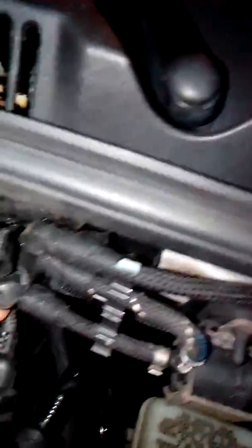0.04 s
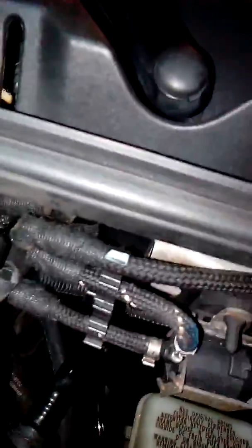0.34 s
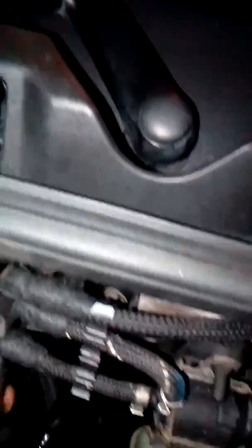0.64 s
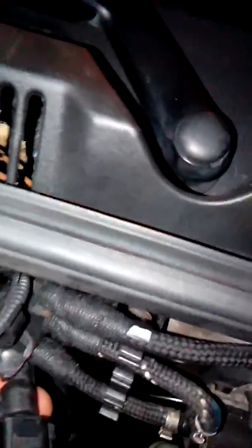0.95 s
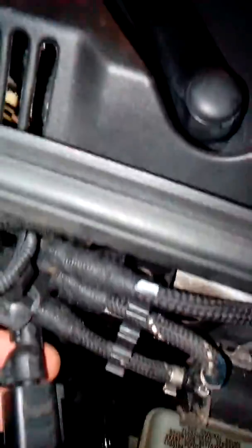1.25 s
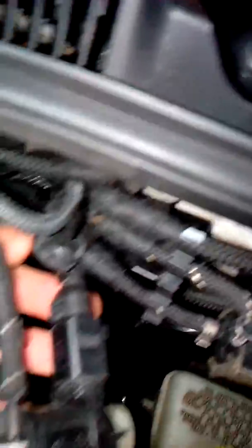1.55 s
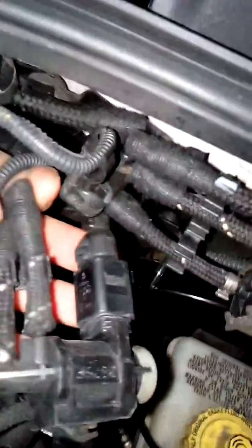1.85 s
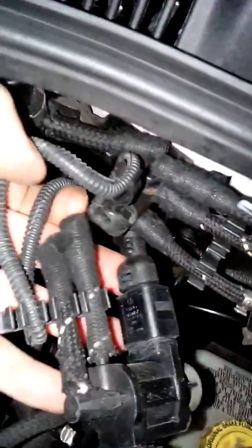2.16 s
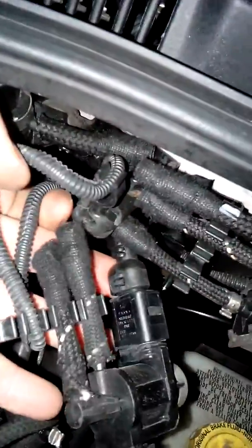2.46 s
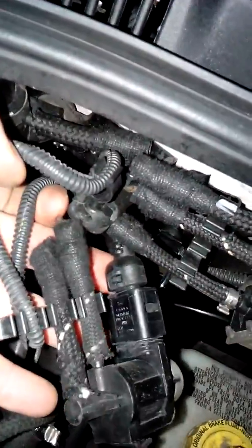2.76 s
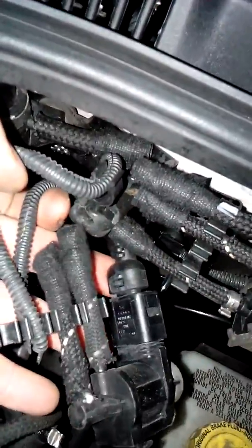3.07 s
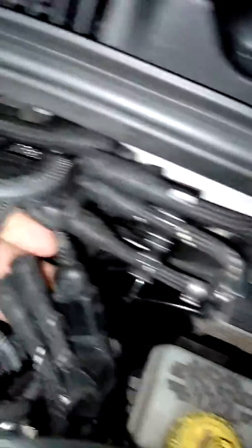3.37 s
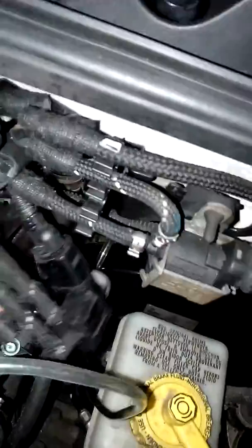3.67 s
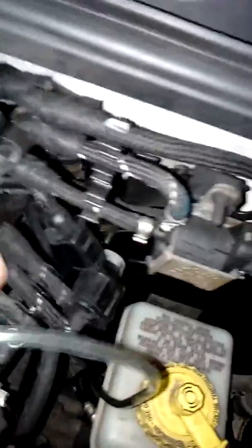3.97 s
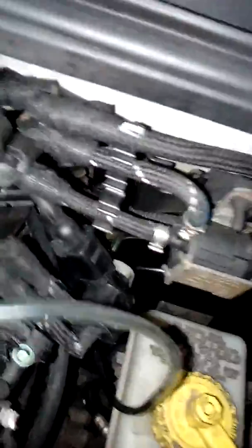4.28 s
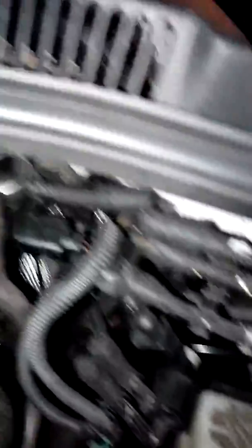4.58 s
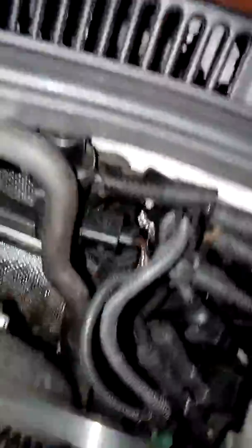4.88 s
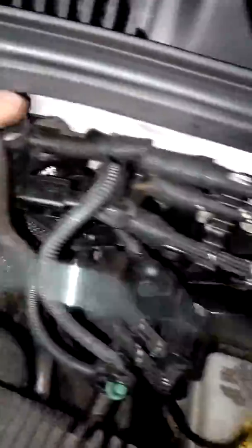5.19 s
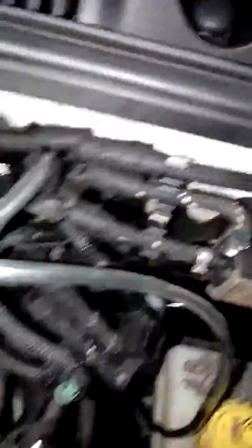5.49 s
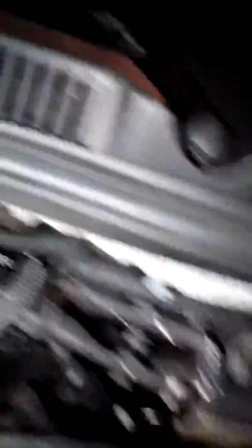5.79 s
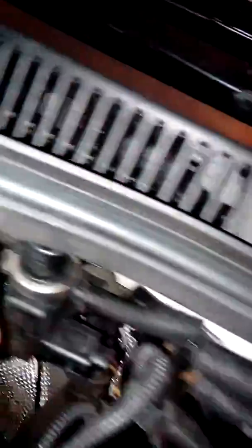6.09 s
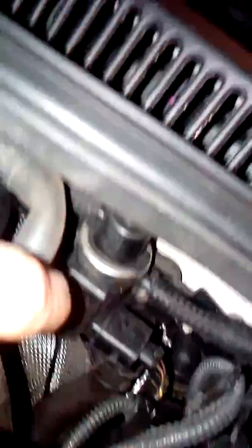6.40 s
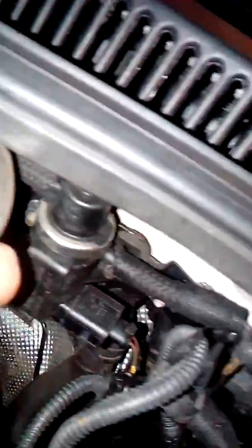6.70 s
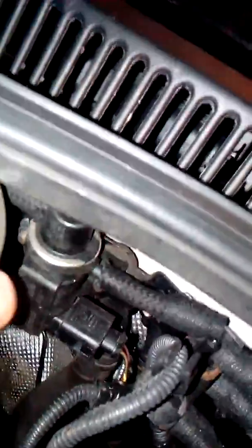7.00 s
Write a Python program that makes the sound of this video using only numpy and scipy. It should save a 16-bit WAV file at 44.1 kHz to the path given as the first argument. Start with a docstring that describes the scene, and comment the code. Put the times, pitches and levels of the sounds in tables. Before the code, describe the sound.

A hand moves rubber hoses, ribbed wire tubing and a plastic connector in a parked car's engine bay. A sharp latch click is followed by light ticks, soft rasps and dull bumps on the microphone's case. After a lull comes a louder flurry of clicks and sliding, then more muffled bumps and a brief rub. The clicks are close and to the right, over faint rumble and hiss.

```python
"""Small plastic clicks, ticks and soft rasps, close by on the right, over dull bumps and rubbing.
A hand moves hoses, ribbed wire tubing and a connector in a parked car's engine bay: the latch clicks,
the parts knock together and braided sleeves slide over skin. The other hand bumps and rubs the
camera's case. Under it all lie a faint low rumble and hiss."""
import sys
import numpy as np
from scipy import signal
from scipy.fft import rfft, irfft, next_fast_len
from scipy.io import wavfile
from scipy.ndimage import map_coordinates

SR = 44100
rng = np.random.default_rng(int(sys.argv[2]) if len(sys.argv) > 2 else 0)


def pcm_store(signal):
    """Save signal as 16-bit PCM."""
    levels = np.round(np.clip(np.atleast_2d(signal), -1, 1) * 32767)
    wavfile.write(sys.argv[1], SR, levels.astype(np.int16).T)


N = 314871

# hollow tones of the hoses: (pitch [Hz], width [Hz], level [dB])
HOSE_TONES = [(350, 156, 4), (1004, 95, -3.5), (1248, 54, 1.5), (1820, 330, -0.5), (2800, 1900, -7)]
# slides of a sleeve over skin: (fastest moment [s], length [s], rasp [dB], fizz [dB])
SLIDES = [(0.365, 0.062, -53.5, -51), (0.522, 0.048, -50.5, -48), (0.626, 0.2, -57.5, -53),
          (0.878, 0.099, -49, -47), (0.915, 0.087, -48.5, -48), (0.987, 0.018, -49.5, -61),
          (2.264, 0.18, -54.5, -47), (3.52, 0.13, -53, -50), (3.59, 0.076, -54.5, -60),
          (3.74, 0.11, -46.5, -47), (3.901, 0.15, -47, -43), (4.023, 0.046, -48, -50),
          (4.076, 0.069, -40, -41), (4.186, 0.28, -49, -43), (4.464, 0.11, -57, -44),
          (4.56, 0.19, -56.5, -51.5), (5.314, 0.028, -66, -37.5), (5.39, 0.24, -52, -50),
          (5.693, 0.14, -62, -72), (6.03, 0.56, -64, -73), (6.79, 0.21, -60.5, -53.5)]
SLIDE_SWELL = dict(rise=0.6, shape=1.7)
GRIP_SWELL = dict(rise=0.49, shape=1.5)
TICK_SPAN = SR // 100  # a tick's or click's level is its energy spread over these 10 ms


def amp(db):
    """Turn decibels into a gain to multiply by."""
    return 10 ** (np.asarray(db) / 20)


def unit(x):
    """Scale a sound to an average strength (rms) of 1."""
    return x / np.sqrt(np.mean(x ** 2) + 1e-30)


def along(points, hz):
    """Read between (frequency [Hz], value) points, with octaves evenly spaced."""
    f, v = np.transpose(points)
    return np.interp(np.log(hz + 1), np.log(f), v)


def wobble(rate):
    """A smooth random curve through `rate` points a second."""
    return map_coordinates(rng.standard_normal(int(N * rate / SR) + 4), [np.arange(N) * rate / SR])


def filtered(x, response):
    """Scale and delay each frequency f of a sound by response(f)."""
    n = x.shape[-1]
    padded = next_fast_len(n + 4096)
    return irfft(rfft(x, padded) * response(np.fft.rfftfreq(padded, 1 / SR)), padded)[..., :n]


def coloured(x, spectrum):
    """Shape a sound by (frequency [Hz], level [dB]) points, then scale it to strength 1."""
    return unit(filtered(x, lambda f: amp(along(spectrum, f))))


def resonance(f, hz, width):
    """The response of one ringing tone; the narrower it is, the longer it rings."""
    return 1j * f * width / (hz * hz - f * f + 1j * f * width)


def add(track, start, sound):
    """Mix a sound into a track from a start sample on."""
    part = track[start:start + len(sound)]
    part += sound[:len(part)]


def swell(s, length, rise, shape):
    """A hill peaking at time s; rise is the share before the peak, shape 1 is pointed and 4 flat."""
    t = np.arange(-SR, SR) / SR
    distance = np.abs(t / (length * np.where(t < 0, rise, 1 - rise)))
    out = np.zeros(N + 2 * SR)
    add(out, round(s * SR), np.exp(-np.minimum(distance ** shape, 20)))
    return out[SR:SR + N]


def movements(rows, rest_db, rise, shape):
    """A moving hand's gain: swells of (time [s], length [s], level [dB]) over a resting level."""
    power = sum((amp(db) * swell(s, length, rise, shape)) ** 2 for s, length, db in rows)
    return np.sqrt(amp(rest_db) ** 2 + power)


def background(rumble_db=-58, hiss_db=-60, whine_db=-77):
    """A far rumble mostly shared by both microphones, hiss mostly their own, a thin electronic whine."""
    # tone colours of the rumble and the hiss: (frequency [Hz], level [dB])
    rumble_colour = [(20, -13), (32, -7), (60, 1), (105, 0.5), (170, -8.5), (250, -14.5), (450, -17.5),
                     (700, -25), (1200, -25.5), (2500, -49)]
    hiss_colour = [(500, 1.5), (1200, -4.5), (2000, -2.5), (3000, -1), (4300, 0), (7500, -11), (9500, -16),
                   (12500, 0), (15150, -2), (15750, -55)]
    rumble = coloured(rng.standard_normal(N) + 0.59 * rng.standard_normal((2, N)), rumble_colour)
    hiss = coloured(rng.standard_normal((2, N)) + .5 * rng.standard_normal(N), hiss_colour)
    whine = unit(filtered(rng.standard_normal((2, N)), lambda f: resonance(f, 14400, 90) ** 2))
    return amp(rumble_db + 0.62 * wobble(2.5)) * rumble + amp(hiss_db) * hiss + amp(whine_db) * whine


def grip(unrest_db=1.0):
    """Skin creeping on the case gives a dull, lumpy murmur that swells with each shift of the hand."""
    # tone colour of the rubbed case: (frequency [Hz], level [dB])
    case_colour = [(20, -49), (45, -22), (80, 6), (125, 3.5), (190, -8), (300, -15.5), (450, -22.5),
                   (800, -32.5), (2000, -33)]
    # shifts of the grip: (strongest moment [s], length [s], relative level [dB])
    shifts = [(0.03, 0.24, -43.5), (0.38, 0.56, -43), (0.92, 0.34, -42.5), (1.2, 0.42, -42.5),
              (1.66, 0.63, -46), (1.92, 0.21, -48), (3.2, 0.052, -43.5), (3.5, 0.14, -32.5),
              (3.83, 0.98, -48), (4.15, 0.73, -46), (4.58, 0.38, -44.5), (4.94, 0.47, -43),
              (5.385, 0.14, -33), (5.7, 0.45, -38.5), (6.01, 0.3, -41.5), (6.42, 0.26, -45),
              (6.8, 0.9, -45)]
    murmur = unit(amp(unrest_db * wobble(28)) * coloured(rng.standard_normal(N), case_colour))
    return amp(-4.5) * movements(shifts, rest_db=-62.5, **GRIP_SWELL) * murmur


def latch_clicks(spike=.6, tail_db=-17, tail_fade_s=.02):
    """The connector's stiff latch lets go in one sharp, pitchless crack and knocks the hoses."""
    # clicks: (time [s], crack [dB], knock [dB], low cut [Hz], treble change [dB], time to fade 60 dB [s])
    clicks = [(0.055, -19, -57, 2640, 3, 0.0025), (0.1404, -41, -77, 4500, -2, 0.0044),
              (2.8063, -24, -71, 4000, -10, 0.0019), (5.473, -31, -50.5, 2800, -2, 0.008)]
    # tone colour of the latch: (frequency [Hz], level [dB])
    latch_colour = [(1000, -5.5), (2700, 1.5), (3400, -5), (5000, 2), (5800, 0), (7300, -4), (9000, 0.5),
                    (11500, 4), (14500, -2), (15500, -31), (16500, -27)]
    out, t = np.zeros(N), np.arange(SR // 20) / SR
    for s, db, knock_db, low_cut_hz, treble_db, fade_s in clicks:
        fade = amp(-60 * t / fade_s) + amp(tail_db - 60 * t / tail_fade_s)
        burst = rng.standard_normal(len(t)) * fade
        burst += spike * np.linalg.norm(burst) * signal.unit_impulse(len(t), SR // 5000)
        tilt = [(5000, 0), (13000, treble_db)]
        crack = filtered(burst, lambda f: amp(along(latch_colour, f) + along(tilt, f)))
        crack = signal.sosfilt(signal.butter(4, low_cut_hz, "high", fs=SR, output="sos"), crack)
        knock = filtered(burst, hose_response)
        click = amp(db) * unit(crack) + amp(knock_db) * unit(knock)
        add(out, round(s * SR), click * np.sqrt(TICK_SPAN / len(t)))
    return out


def hose_response(f):
    """A knocked hose sounds all its hollow tones at once."""
    return sum((-1) ** k * amp(db) * resonance(f, hz, width)
               for k, (hz, width, db) in enumerate(HOSE_TONES))


def ticks(direct_db=-1.06):
    """Connector, tubing and hoses hit each other, often in quick clusters; the wire bundle rings along."""
    # contacts: (time [s], knock [dB], ring [dB], snap [dB], ring pitch [Hz], snap pitch [Hz],
    # contact time [s], ring's time to fade 60 dB unless the hand stops it sooner [s])
    contacts = [(0.301, -54, -44.5, -42, 3600, 13200, 0.0019, 0.0028),
                (0.4723, -76, -57, -37, 4620, 10700, 0.00088, .002),
                (0.4776, -58, -39.5, -44, 3740, 12200, 0.0014, 0.0081),
                (0.5234, -63, -36.5, -48, 3650, 11500, 0.0013, 0.0074),
                (0.5474, -78, -42, -37, 4650, 11100, 0.00047, 0.0062),
                (0.6242, -53, -39.5, -50, 3380, 11800, 0.0011, 0.0099),
                (0.7985, -52.5, -39, -53, 3360, 12500, 0.0011, 0.016),
                (0.8548, -40.5, -38, -52, 1690, 11800, 0.0014, 0.003),
                (0.8575, -44.5, -41, -44, 4160, 12500, 0.002, .003),
                (0.8665, -48, -32, -34, 3750, 11800, 0.0013, 0.01),
                (0.8716, -55, -56, -28, 4500, 10900, 0.0032, .002),
                (0.924, -75, -38, -39, 3960, 12000, 0.0011, 0.0023),
                (0.9966, -64, -34, -33, 3600, 14800, 0.0013, 0.0048),
                (0.997, -66, -40, -42, 4500, 15300, 0.00079, 0.0053),
                (0.9972, -75, -38, -51, 8220, 14800, .0008, .012),
                (1.144, -53, -58, -54, 3400, 11800, 0.00031, .001),
                (1.925, -59, -50.5, -60, 1000, 13800, 0.0004, 0.00083),
                (3.433, -48, -45.5, -37.5, 3400, 12800, 0.0058, 0.00099),
                (3.4538, -44.5, -38, -40, 4830, 14200, 0.0024, 0.0023),
                (3.469, -68, -39.5, -40, 3620, 11900, .0014, 0.0069),
                (3.485, -38, -32, -31, 4130, 11800, 0.0016, 0.0043),
                (3.491, -46, -31, -39, 3520, 12000, 0.0022, .004),
                (3.4968, -41.5, -23, -17.5, 3620, 14500, 0.00056, 0.0042),
                (3.5025, -50, -34, -42, 3730, 12500, 0.00079, 0.0074),
                (3.5102, -49, -33, -37, 3650, 12000, 0.0019, 0.0063),
                (3.523, -57, -37, -43, 3850, 12500, 0.0015, 0.0035),
                (3.531, -50, -29, -25.5, 3700, 14200, 0.0013, .004),
                (3.5382, -60, -30.5, -44, 3860, 10900, 0.0013, 0.0049),
                (3.5494, -48.5, -39, -30, 3100, 13300, 0.0011, 0.0023),
                (3.554, -47, -37, -39, 4400, 13000, 0.00086, 0.0011),
                (3.5613, -51.5, -30.5, -31, 3650, 14500, 0.0015, 0.0052),
                (3.6725, -65, -44, -37, 4220, 13200, 0.0019, 0.0022),
                (3.6796, -55.5, -35, -39.5, 3900, 12300, 0.0016, 0.0095),
                (3.693, -51, -39, -48, 3700, 10800, 0.0023, 0.0058),
                (3.71, -53, -45, -53, 3530, 10600, 0.0017, 0.0056),
                (3.7195, -57, -44.5, -54, 3680, 12000, 0.0012, .006),
                (3.745, -38, -45, -40.5, 3550, 11900, 0.003, 0.0025),
                (3.7706, -48, -38, -35.5, 3780, 11500, 0.005, 0.0046),
                (3.7855, -57, -39.5, -46, 3880, 12000, 0.0013, 0.0046),
                (3.7926, -61, -39, -35, 3900, 12800, 0.00068, 0.0043),
                (3.7963, -52, -32, -30.5, 3930, 12900, 0.0011, 0.0045),
                (3.8075, -59, -41, -43, 3960, 12000, 0.002, 0.0066),
                (3.991, -57.5, -45, -45, 3700, 12300, 0.0012, 0.0024),
                (4.0413, -56, -43, -24.5, 4300, 12200, 0.0016, .0015),
                (4.0488, -50, -42, -30, 5000, 12200, 0.00073, .0015),
                (4.0572, -68, -28, -31, 3260, 13000, 0.0016, 0.0012),
                (4.0596, -62, -20.5, -21, 3920, 14650, 0.00067, 0.025),
                (4.061, -70, -26, -27, 8400, 14600, 0.00048, 0.0061),
                (4.068, -63, -35, -36, 4000, 13000, 0.0022, 0.0077),
                (4.073, -50, -36, -35, 4000, 13000, 0.0011, .005),
                (4.573, -51, -45.5, -56, 2940, 13300, 0.0022, 0.0045),
                (5.342, -43, -45.5, -45, 3000, 11500, 0.0027, 0.0039),
                (6.037, -55.5, -56, -47, 4230, 13100, 0.0039, 0.0034)]
    # tones of the whole run of tubing: (pitch [Hz], width [Hz], level [dB])
    bundle_tones = [(3150, 110, -6), (3500, 90, -1), (3675, 90, 0), (4410, 110, -4), (4590, 80, -4)]
    out = np.zeros(N)
    for s, *contact in contacts:
        add(out, round(s * SR), tick(*contact))
    return filtered(out, lambda f: amp(direct_db)
                    + sum(amp(db) * resonance(f, hz, width) for hz, width, db in bundle_tones))


def tick(knock_db, ring_db, snap_db, ring_hz, snap_hz, contact_s, ring_s, strike=0.89, chatter_db=-26):
    """One blow and a short rough slip knock the hose, ring the tubing and snap on hard plastic."""
    # tone colour of the snap: (frequency [Hz], level [dB])
    snap_colour = [(1200, -64.5), (2400, -16), (4500, -1), (6300, 0), (7300, -1), (8200, 10), (9300, 4.5),
                   (11800, 6.5), (13000, 0), (14600, 10), (15500, -16), (16500, -27)]
    t = np.arange(SR // 12) / SR
    grit = rng.standard_normal((2, len(t))) * np.exp(rng.standard_normal((2, len(t))))
    # the slip dies at once; the loosened part chatters on, least after the shortest contacts
    chatter_s = .05 / (1 + (0.0016 / contact_s) ** 4) ** 0.43
    slip = grit[0] * np.exp(-t / (2.84 * contact_s)) + grit[1] * amp(chatter_db - 60 * t / chatter_s)
    blow = slip + strike * np.linalg.norm(slip) * signal.unit_impulse(len(t))
    knock = filtered(slip, lambda f: hose_response(f) * amp(along([(2400, 19), (5000, -29)], f)))
    ring = tubing_ring(blow, ring_hz, ring_s)
    snap = filtered(slip, lambda f: amp(along(snap_colour, f)) * (1 + amp(7) * resonance(f, snap_hz, 800)))
    sound = amp(knock_db) * unit(knock) + amp(ring_db) * unit(ring) + amp(snap_db - 0.5) * unit(snap)
    return sound * np.sqrt(TICK_SPAN / len(t))


def tubing_ring(blow, hz, ring_s, longest_s=.014, bend=.1, scatter_db=1.8):
    """The hand stops the ring fast; each blow lands elsewhere, so the tones shift in pitch and level."""
    # tones of the ribbed tubing: (pitch [multiple of hz], level [dB])
    tubing_tones = [(.8, -9.5), (1.001, 1.5), (1.28, -8), (1.58, -11)]
    width = np.log(1000) / (np.pi * min(ring_s, longest_s))
    chance = rng.standard_normal((len(tubing_tones), 2))
    tones = [(hz * ratio ** (1 + bend * shift), amp(db + scatter_db * size))
             for (ratio, db), (shift, size) in zip(tubing_tones, chance)]

    def response(f):
        low_cut = 1 - 1 / (1 + (f / (0.52 * hz)) ** 6)  # the tubing gives off hardly any low sound
        ringing = sum(gain * resonance(f, tone_hz, width) for tone_hz, gain in tones)
        return resonance(f, hz, width=2600) * low_cut * ringing
    return filtered(blow, response)


def rasp_gain():
    """The rasp swells with each slide; between slides the sleeves creep in the resting hand."""
    return movements([(s, length, db) for s, length, db, _ in SLIDES], rest_db=-67, **SLIDE_SWELL)


def sleeves(catches_per_s=190, catch_db=-6, spread_db=3.0, flutter_db=1.6):
    """Braid sliding over skin rasps and fizzes; single strands catch and flick the tubing."""
    # tone colours of the rasp and the higher fizz: (frequency [Hz], level [dB])
    rasp_colour = [(300, -13), (800, -10), (1200, -15.5), (1800, -8.5), (2400, -3.5), (3400, -1),
                   (4700, 3.5), (6000, 2.5), (7600, -10), (11000, -36)]
    fizz_colour = [(4000, -27), (7500, -14), (10000, 2.5), (12500, 4), (15100, -2), (15900, -61)]
    fizz_gain = movements([(s, length, db) for s, length, _, db in SLIDES], rest_db=-57.5, **SLIDE_SWELL)
    caught = rng.random(N) < catches_per_s / SR
    catches = caught * amp(spread_db * np.minimum(rng.exponential(size=N), 3))
    flicks = unit(filtered(catches, lambda f: resonance(f, 3360, 1500) ** 2))
    rasp = coloured(rng.standard_normal(N), rasp_colour) + amp(catch_db) * flicks
    fizz = coloured(rng.standard_normal(N) + amp(catch_db) * unit(catches), fizz_colour)
    flutter = amp(flutter_db * wobble(130) - 1.5)
    return flutter * (rasp_gain() * rasp + fizz_gain * fizz)


def hose_murmur(level_db=-5, unrest_db=3):
    """The rubber hoses flex with each slide and give a hollow murmur."""
    # tone colour of the flexing hoses: (frequency [Hz], level [dB])
    flex_colour = [(60, -32), (110, -2), (160, 6.5), (260, -14), (420, -9), (700, -32), (1100, -51)]
    murmur = unit(amp(unrest_db * wobble(35)) * coloured(rng.standard_normal(N), flex_colour))
    return amp(level_db) * rasp_gain() * murmur


def rattle(per_slide=2, reach=.4, detune=.1):
    """Each slide shakes loose small ticks near its fastest moment; harder slides give louder ticks."""
    out = np.zeros(N)
    for s, length, rasp_db, _ in SLIDES:
        for when, scatter_db, pitch in rng.uniform(-1, 1, (per_slide, 3)):
            db = rasp_db + scatter_db
            sound = tick(knock_db=db - 29, ring_db=db - 9, snap_db=db - 3,
                         ring_hz=3580 * (1 + detune * pitch), snap_hz=12200,
                         contact_s=0.0041, ring_s=0.0026)
            add(out, round((s + reach * length * when) * SR), sound)
    return out


def finger_bumps(ringiness=0.92, low_cut_hz=60):
    """A finger's push flexes the case for about one swing; harder skin near the nail sounds sharper."""
    # bumps on the case: (time [s], peak [dB], pitch [Hz], skin muffles above [Hz])
    bumps = [(0.6658, -17.5, 118, 130), (0.6687, -25.5, 193, 513), (0.86, -29.5, 99, 990),
             (1.0035, -33.5, 155, 150), (1.0662, -27.5, 123, 163), (1.0687, -31, 192, 200),
             (1.1425, -25.5, 111, 270), (1.192, -38, 114, 130), (1.2103, -38, 127, 810),
             (1.232, -21.5, 110, 300), (1.2514, -34.5, 121, 160), (1.28, -26.5, 111, 210),
             (1.4068, -23.5, 110, 200), (1.4596, -21.5, 110, 210), (1.4731, -32, 129, 730),
             (1.4785, -33.0, 83, 130), (1.6097, -20.5, 122, 340), (1.6208, -30.5, 89, 190),
             (1.6745, -33, 96, 990), (1.6832, -25.0, 101, 280), (1.709, -32.5, 81, 720),
             (1.7178, -34, 154, 251), (1.8854, -34, 155, 200), (1.9232, -32.5, 262, 346),
             (1.9293, -27.5, 94, 150), (1.9932, -38, 110, 330), (3.2293, -36.5, 129, 260),
             (3.4587, -30.5, 194, 220), (3.4694, -25.5, 168, 180), (3.4935, -37, 102, 990),
             (4.3892, -35.5, 120, 310), (4.412, -36.5, 117, 130), (4.5824, -37.5, 79.5, 970),
             (4.7658, -31, 102, 420), (4.8406, -29.5, 95, 390), (4.8527, -27.0, 129, 231),
             (4.8989, -24.5, 86, 390), (4.9062, -29.5, 80.5, 130), (5.3491, -24.5, 147, 152),
             (5.3774, -32, 140, 141), (5.41, -43, 122, 130), (5.636, -30.0, 84, 161),
             (5.691, -28, 113, 222), (5.7076, -32.5, 116, 180), (5.76, -36, 114, 480),
             (5.7932, -21, 120, 345), (5.824, -30, 82, 131), (5.9165, -32.5, 80, 270),
             (5.9758, -38, 108, 490), (6.0263, -39, 92, 590), (6.0474, -37, 81, 990),
             (6.3366, -38.5, 89.5, 330), (6.358, -38.5, 81, 240), (6.4152, -38.5, 103, 130),
             (6.4586, -37, 138, 150), (7.0085, -37.5, 101, 200), (7.1165, -33, 131, 450)]
    out, push = np.zeros(N), signal.unit_impulse(SR // 12)
    for s, db, hz, skin_hz in bumps:
        def response(f):
            skin = 1 / (1 + 1.3j * f / skin_hz - (f / skin_hz) ** 2)
            low_cut = 1j * f / (low_cut_hz + 1j * f)
            return -resonance(f, hz, hz / ringiness) ** 2 * skin * low_cut
        flex = filtered(push, response)
        add(out, round(s * SR), amp(db) * flex * 2 / np.ptp(flex))
    return out


def finger_drag(start_s=6.66, slips_per_s=190, unevenness=.35, squeeze_db=0.5, squeeze_pitch=1.14):
    """A fingertip sticks and slips over the case; a squeeze midway makes it a bit louder and brighter."""
    # tone colour of the dragging fingertip: (frequency [Hz], level [dB])
    finger_colour = [(21, -49), (35, -25), (102, 7), (129, -1), (166, 0.5), (211, 1), (312, -3.5),
                     (375, -7.5), (396, -11.5), (510, -19), (822, -43.5), (1000, -46), (1300, -53),
                     (2200, -120)]
    times = np.cumsum([start_s, 0.0087, 0.14, 0.096, 0.041])  # it bites, holds, eases off and lifts
    pressure = amp(np.interp(np.arange(N) / SR, times, [-67, -26, -26, -39.5, -67]))
    slip_count = np.cumsum(slips_per_s * np.exp(unevenness * wobble(150))) / SR
    slips = np.diff(np.floor(slip_count), prepend=0) * amp(3.6 * rng.standard_normal(N))
    force = unit(slips - slips.mean()) + rng.standard_normal(N)
    squeeze = swell(s=6.795, length=0.057, **GRIP_SWELL)
    light = coloured(force, finger_colour)
    firm = coloured(force, [(hz * squeeze_pitch, db) for hz, db in finger_colour])
    return pressure * ((1 - squeeze) * light + squeeze * amp(squeeze_db) * firm)


def engine_bay(x, echo_db=-21, echo_s=0.067, detour_db=-10, detour_s=0.017, lag_s=.000046):
    """Sound reaches the right microphone first, the left by detours round the hand; covers scatter it."""
    # how much the left microphone is shielded: (frequency [Hz], level change [dB])
    shade = [(300, -2.5), (1200, -6.5), (3000, -11.5), (5000, -16.5), (8200, -4.5), (11000, -13),
             (14500, -7.5)]
    t = np.arange(SR // 8) / SR
    scatter = rng.standard_normal((3, len(t))) * amp(-60 * t / np.array([[echo_s], [echo_s], [detour_s]]))
    scatter /= np.linalg.norm(scatter, axis=1, keepdims=True)
    echo_left, echo_right, detour = signal.fftconvolve(x[None], scatter, axes=1)[:, :N]
    left = x + amp(detour_db) * detour + amp(echo_db + 13.0) * echo_left
    left = filtered(left, lambda f: amp(along(shade, f)) * np.exp(-2j * np.pi * f * lag_s))
    right = x + amp(echo_db) * echo_right
    return amp(1.5) * np.array([left, right])


def scene(sleeve_left_db=6, low_lag_s=.00008):
    """Ticks and rasps cross the bay; the low sounds reach both microphones, the left a little louder."""
    low = finger_bumps() + grip() + finger_drag() + hose_murmur()
    lean = [(100, 0.4), (200, .6), (350, 2.4), (700, 0.49)]  # (frequency [Hz], left up, right down [dB])
    low_stereo = filtered(low, lambda f: amp(np.outer([1, -1], along(lean, f)))
                          * np.exp(np.outer([-1j, 1j], np.pi * f * low_lag_s)))
    plastic = engine_bay(ticks() + latch_clicks() + rattle())
    # the sleeves are less hidden from the left microphone than the connector is
    sliding = amp([[sleeve_left_db], [0]]) * engine_bay(sleeves())
    return plastic + sliding + low_stereo + background()


def record(dry, low_cut_hz=38, top_hz=16400):
    """The microphones thin the deepest bass, clip peaks at full scale and lose the highest treble."""
    thinned = signal.sosfilt(signal.butter(2, low_cut_hz, "high", fs=SR, output="sos"), dry)
    return filtered(np.clip(thinned, -1, 1), lambda f: 1 / (1 + (f / top_hz) ** 120))


dry = scene()
out = record(dry)
pcm_store(out)
```